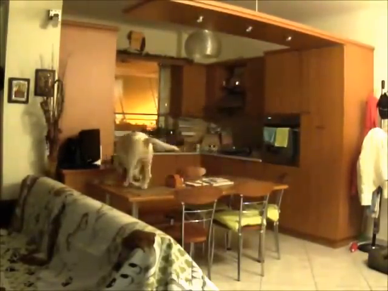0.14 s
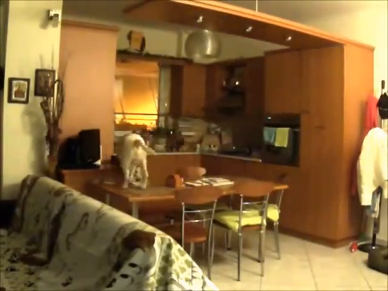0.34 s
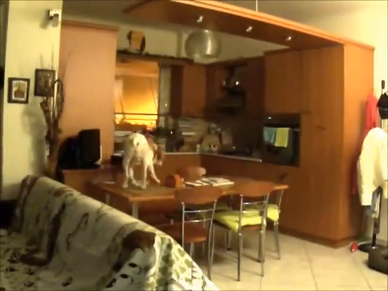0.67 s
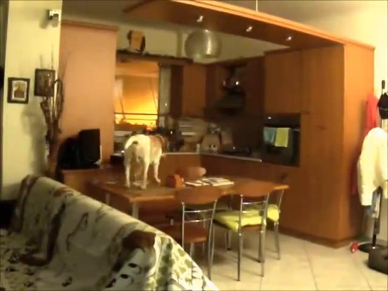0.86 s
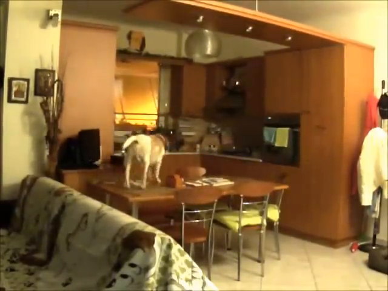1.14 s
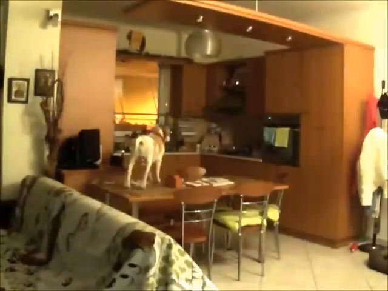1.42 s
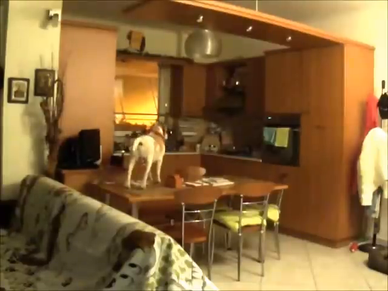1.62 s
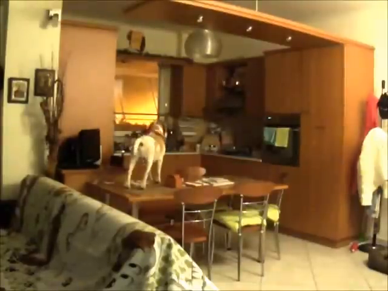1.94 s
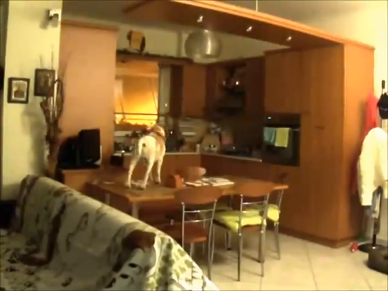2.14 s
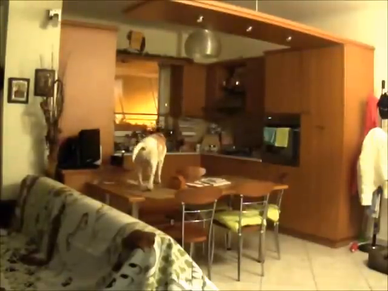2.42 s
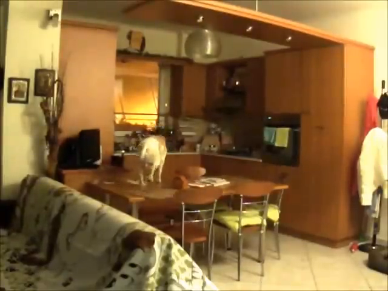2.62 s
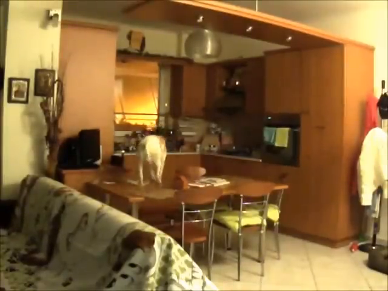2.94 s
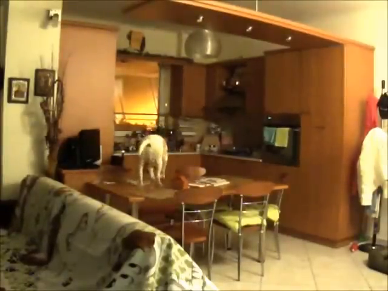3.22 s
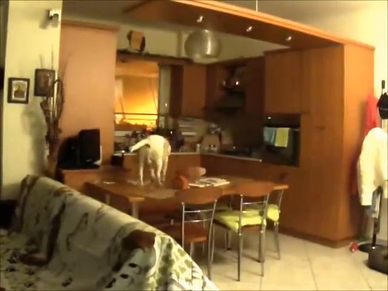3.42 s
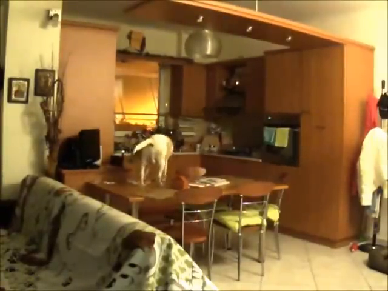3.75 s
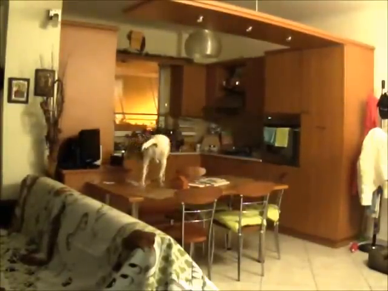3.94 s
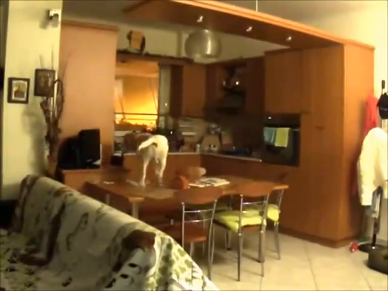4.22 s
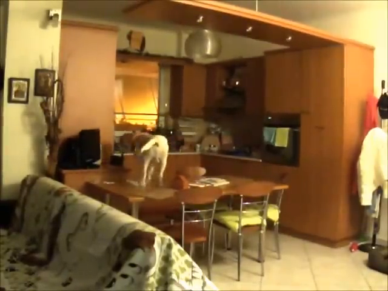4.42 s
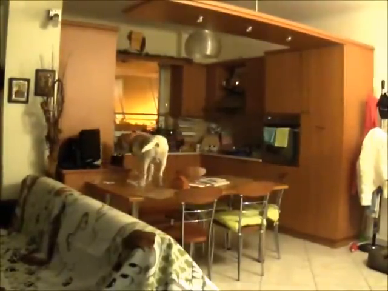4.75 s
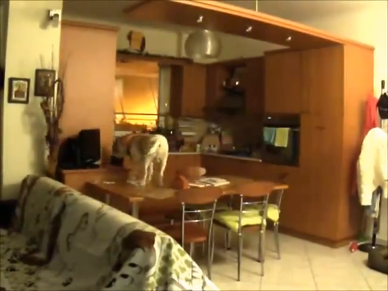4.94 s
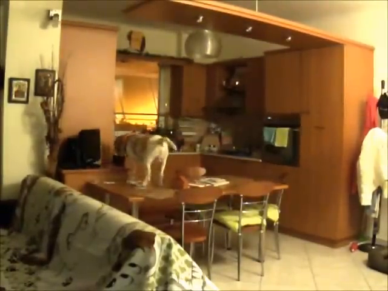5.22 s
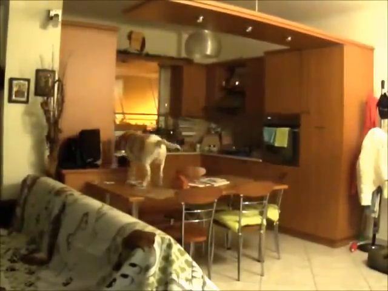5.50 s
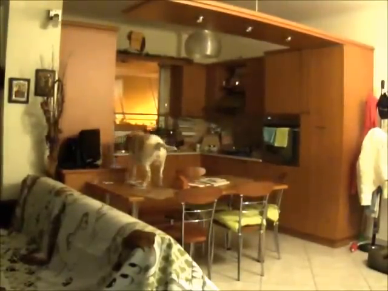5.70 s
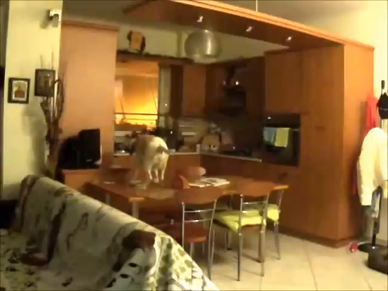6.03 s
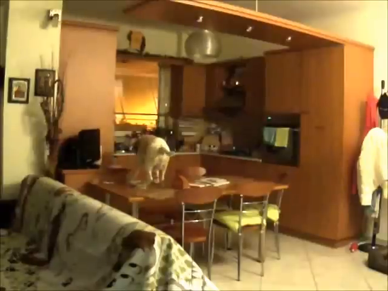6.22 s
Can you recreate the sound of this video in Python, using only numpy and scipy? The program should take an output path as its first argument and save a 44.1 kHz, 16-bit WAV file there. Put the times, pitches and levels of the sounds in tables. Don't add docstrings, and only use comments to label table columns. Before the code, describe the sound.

A dog's nails tick and skid on a wooden tabletop, its tag jingling faintly; bumps and knocks build to a loud scraping shove over fridge hum.

```python
import sys
import numpy as np
from scipy import signal
from scipy.fft import rfft, irfft
from scipy.io import wavfile

SR = 44100
rng = np.random.default_rng(int(sys.argv[2]) if len(sys.argv) > 2 else 0)


def volts(x):
    e = np.asarray(x, float) / 20
    return 10 ** e


def digitize_waveform(pressure):
    field = np.atleast_2d(pressure).T
    bounded = np.clip(field, -1, 1)
    quanta = np.round(bounded * 32767).astype(np.int16)
    wavfile.write(sys.argv[1], SR, quanta)


N = 280917

# (f/Hz, level/dB, t60/s)
WOOD = [(607, 3, 0.017), (762, 10, 0.014), (920, 8.5, 0.13), (1050, 12.5, 0.053), (1130, 5, 0.12),
        (400, -21, 0.05), (242, -15, 0.24)]


def unit(x):
    return x / np.sqrt(np.sum(x ** 2))


def level(x, db):
    return unit(x) * np.sqrt(len(x)) * volts(db)


def colour(x, table):
    hz, db = np.transpose(table)
    f = np.fft.rfftfreq(len(x), 1 / SR) + 1
    gain = volts(np.interp(np.log(f), np.log(hz), db))
    return irfft(rfft(x) * gain, len(x))


def band(x, lo_hz, hi_hz):
    sos = signal.butter(2, [lo_hz, min(hi_hz, SR / 2.1)], "band", fs=SR, output="sos")
    return signal.sosfilt(sos, x)


def ring(x, hz, t60_s):
    pole = np.exp((2j * np.pi * hz - np.log(1000) / t60_s) / SR)
    return signal.lfilter([1], [1, -pole], x).imag


def resonate(x, peaks):
    out = 0
    for k, (hz, width_hz, db) in enumerate(peaks):
        t60_s = np.log(1000) / (np.pi * width_hz)
        out = out + (-1) ** k * volts(db) * width_hz * ring(x, hz, t60_s)
    return out


def slips(rate_hz, spread_db):
    chance = rng.random((3, N))
    happens = chance[0] < rate_hz / SR
    size = volts(-min(spread_db, 3.5) * np.log(chance[2] + .03))
    return happens * np.sign(chance[1] - .5) * size


def stroke(s, hold_s, db, attack_s, release_s):
    edges_s = np.cumsum([s - attack_s, attack_s, hold_s, release_s])
    gain = np.zeros(N)
    on = np.arange(max(int(edges_s[0] * SR), 0), min(int(edges_s[-1] * SR), N))
    gain[on] = volts(db + np.interp(on / SR, edges_s, [-40, 0, 0, -40]))
    return gain


def swell(x, ms):
    return x * (1 - np.exp(-np.arange(len(x)) * 1000 / SR / max(ms, .2)))


def add(out, s, x):
    i = int(s * SR)
    out[i:i + len(x)] += x[:N - i]


def room_tails():
    # (f/Hz, t60/s)
    decays = [(250, 0.96), (600, 1), (1400, 0.74), (3000, 0.67), (6000, 0.62), (11000, 0.62)]
    t = np.arange(int(.9 * SR)) / SR
    bands = np.array([band(rng.standard_normal(3 * SR), hz / 1.5, hz * 1.5) for hz, _ in decays])
    bands /= np.std(bands, axis=1, keepdims=True) / np.sqrt([[hz] for hz, _ in decays])
    early = (1 - np.exp(-t / 0.0006)) * (1 + 0.23 * np.exp(-t / 0.093))
    return bands, np.array([np.exp(-np.log(1000) * t / t60_s) for _, t60_s in decays]) * early


def room(x, tails, place, direct_db):
    # (delay/ms, level/dB)
    bounces = [(4, -18), (6.5, -17), (9, -19), (13, -18), (22, -17), (31, -20)]
    bands, decay = tails
    start = int(place * SR)
    echo = unit(np.sum(bands[:, start:start + decay.shape[1]] * decay, axis=0))
    echo[0] = volts(direct_db)
    for k, (ms, db) in enumerate(bounces):
        echo[int(ms * (.9 + .2 * place) * SR / 1000)] += (-1) ** k * volts(db)
    return signal.fftconvolve(x, echo)


def hum():
    # (f/Hz, level/dB per Hz)
    air_spectrum = [(15, -66), (25, -32), (173, -11), (207, -12.5), (247, -10), (588, -3.5), (651, -5),
                    (979, -8.5), (1330, -9), (3320, -19), (3590, -23), (4070, -22.5), (5260, -23),
                    (11000, -25.5), (14300, -63), (22000, -120)]
    # (f/Hz, width/Hz, level/dB)
    peaks = [(100.1, 3.1, -7.5), (235, 17, -9), (301.2, 6.7, 2.5), (345, 38, -4.5), (599.4, 6.6, 4.5),
             (751, 10, -3.5), (1000, 53, -2.5)]
    # (f/Hz, level/dB)
    whine = [(3508, -70)]
    t = np.arange(N) / SR
    air = level(colour(rng.standard_normal(N), air_spectrum), -1.1)
    air += level(resonate(rng.standard_normal(N), peaks), -5)
    buzz = 0.49 + np.cos(np.pi * 59.9 * t) ** 30
    air += level(buzz * band(rng.standard_normal(N), 2100, 6200), -9.5)
    tones = sum(np.sqrt(2) * volts(db) * np.sin(2 * np.pi * hz * t) for hz, db in whine)
    return air * volts(-52) + tones


def contacts():
    # (t/s, click/dB, wood knock/dB, nail treble/dB)
    claws = [(0.0024, -31.5, -1.5, -12), (0.3347, -39.5, 0, -15), (0.4114, -24.5, -5, -5),
             (0.7113, -59, -26, -14), (1.0047, -42.5, -12, -13), (1.2141, -32, -0.5, -5),
             (2.8893, -37.5, -28, -5.5), (3.3514, -27, -6.5, -9.5), (3.6027, -36, -3, -8.5),
             (3.764, -31.5, -3, -1.5), (3.772, -27, -8.5, -8.5), (3.989, -39.5, -2, -12),
             (4.37, -30.5, -4.5, -7), (4.5246, -29, -1, -3), (4.5538, -28, -16, -7),
             (4.882, -28.5, -0.5, -1.5), (4.9033, -27.5, -2, -21), (5.623, -40.5, 7, -5),
             (6.0108, -17, 0.5, -3), (6.1605, -12, -3.5, -15)]
    # (t/s, click/dB, wood knock/dB)
    scuffs = [
        (0.213, -42, -25),
        (2.8188, -39.5, -20),
        (3.0889, -53, -16),
        (3.1469, -40, 3),
    ]
    # (t/s, click/dB, wood knock/dB, build-up/ms)
    bumps = [
        (2.3348, -29.5, 4.5, 4.3),
        (2.4762, -25.5, 4, 6.6),
        (2.6479, -25.5, 2, 2.8),
        (2.6748, -27.5, 0.5, 2.7),
        (5.277, -39, 13.5, 7.3),
        (5.361, -35.5, 10, 4.8),
        (5.4483, -28, 7.5, 1.1),
        (5.6007, -28.5, 11, 1.9),
        (5.6925, -9, -1, 2.5),
        (5.7072, -21, 7, 4.2),
    ]
    blows = [(s, db, wood, 5 + 0.34 * treble, treble, 3.8) for s, db, wood, treble in claws]
    blows += [(*row, 1.5, -8, 1.7) for row in scuffs]
    blows += [(s, db, wood, -9, -19, ms) for s, db, wood, ms in bumps]
    return sorted(blows)


def hits(tails):
    out, tick = np.zeros(N), np.eye(1, 4096, 64)[0]
    for s, db, wood_db, edge_db, treble_db, ms in contacts():
        chance, spots = rng.standard_normal((len(WOOD), 2)), rng.random(24)
        knock = sum(volts(g + a) * ring(tick, hz * (1 + 0.016 * b), t60_s)
                    for (hz, g, t60_s), (a, b) in zip(WOOD, chance))
        grain = tick + volts(-8) * unit(sum(ring(tick, 1200 + 9500 * u ** 1.4, .022) for u in spots))
        click = colour(grain, [(250, wood_db - 15.5), (600, wood_db - 8), (1000, wood_db - 0.5),
                               (1500, -0.62), (2400, -0.45), (4000, edge_db),
                               (7500, treble_db - 1.5), (11000, treble_db - 3)])
        sound = click + volts(wood_db - 23) * unit(band(knock, 260, 2300))
        heard = room(sound, tails, rng.random(), direct_db=-15)
        add(out, s - .002, volts(db + 29.5) * swell(heard, ms))
    return out


def skids(tails):
    # (t/s, length/s, level/dB, wood share/dB, treble share/dB)
    moves = [(0.057, 0.14, -56, -14, -1), (0.2, .08, -56.5, -15, 6.5), (0.337, 0.064, -45.5, -4, -3),
             (0.51, 0.13, -50.5, -20, 2), (0.99, 0.066, -55.5, -20, 3), (2.362, 0.085, -35.5, -4, -10.5),
             (2.463, 0.15, -32.5, 1.5, -8), (2.767, 0.033, -40.5, -5, -8), (2.826, 0.094, -51, -18, 6.5),
             (3.104, 0.061, -56, -7, 12.5), (5.733, 0.033, -15, -1.5, -19), (5.811, 0.143, -25.5, -4, -9)]
    # (f/Hz, level/dB per Hz)
    rub_spectrum = [(710, -48), (1200, -2.5), (2190, -4), (2360, -6), (3970, -11.5), (7320, -27.5),
                    (11000, -28), (14300, -57), (22000, -120)]
    gains = np.array([stroke(s, hold_s, db, .04, 0.029) for s, hold_s, db, _, _ in moves])
    gain = gains.sum(axis=0)
    wood, treble = volts(np.transpose(moves)[3:]) @ gains
    rub = colour(slips(3500, 5.1), rub_spectrum)
    board = band(sum(volts(g) * ring(slips(2500, 5.1), hz, t60_s) for hz, g, t60_s in WOOD[:5]), 400, 1270)
    dry = gain * level(band(rub, 1280, 3520), -9)
    dry += wood * level(board, -10)
    dry += treble * level(band(rub, 2800, 11000), -1.5)
    return room(dry, tails, 0.44, direct_db=-5)[:N]


def tag(tails):
    # (t/s, top note/dB, lower notes' share/dB)
    blows = [(0.3586, -33.5, -6), (0.3764, -38, 6), (0.3994, -36, 2), (0.4115, -45, -2), (0.7183, -46, -5),
             (0.8415, -38, -2.5), (0.8694, -52, 0), (0.9043, -37.5, -10), (0.9378, -47, -13),
             (0.9981, -64, -6), (1.1887, -59, 4), (5.2405, -60, -5)]
    # (f/Hz, t60/s)
    modes = [(10910, .04), (9340, .045), (7480, .008)]
    out, t = np.zeros(N), np.arange(8192) / SR
    for s, db, share_db in blows:
        chatter = unit(rng.standard_normal(len(t)) * np.exp(-t / 0.017))
        notes = [unit(band(ring(chatter, hz, t60_s), hz / 1.05, hz * 1.05)) for hz, t60_s in modes]
        notes.append(unit(band(chatter, 4400, 8200)))
        notes_db = [0, share_db, share_db - 6, -4]
        jingle = sum(volts(g) * note for g, note in zip(notes_db, notes))
        add(out, s - .001, volts(db + 19.5) * jingle)
    return room(out, tails, 0.41, direct_db=1.9)[:N] * volts(-6.5)


def rings(tails):
    # (t/s, level/dB, f/Hz)
    taps = [(0.41, -39, 1500), (0.411, -37, 2870), (0.653, -47.5, 1195), (0.71, -47, 2640),
            (0.77, -56, 2330), (0.845, -51.5, 3550), (1.012, -57, 5080), (2.338, -47, 990),
            (2.648, -56, 9800), (2.648, -45.5, 4520), (3.145, -41, 3990), (3.352, -36, 2300),
            (3.352, -38.5, 1544), (3.351, -37.5, 2680), (3.35, -40, 3130), (3.773, -45, 1025),
            (4.372, -40, 2730), (4.374, -50, 3170), (4.526, -37, 1570), (4.527, -37, 3106),
            (4.555, -42, 920), (4.883, -39.5, 1633), (4.904, -44, 4400), (5.451, -35.5, 1050),
            (5.602, -30.5, 1050), (5.625, -33, 906), (5.697, -26, 1570), (5.707, -19, 921),
            (5.712, -22, 1513)]
    # (t/s, level/dB, f/Hz)
    dish = [
        (2.336, -44, 2000),
        (2.39, -45, 1990),
        (2.646, -28.5, 2030),
        (2.675, -37, 2005),
        (2.74, -43, 2010),
    ]
    out, tap = np.zeros(N), np.pad(np.hanning(7), (0, 8192))
    notes = [(s, db, hz, .045 * (1000 / hz) ** .4) for s, db, hz in taps] + [(*row, 0.13) for row in dish]
    for s, db, hz, t60_s in notes:
        pair = ring(tap, hz, t60_s) + .7 * ring(tap, hz * 1.03, t60_s / 2)
        note = unit(band(pair, hz / 2.6, hz * 2.04))
        heard = room(note, tails, rng.random(), direct_db=9)
        add(out, s - .001, volts(db + 27) * swell(heard, 5))
    return out


def ticks():
    # (t/s, level/dB, centre f/Hz)
    creaks = [
        (1.0065, -50, 9800),
        (2.891, -48, 4500),
        (4.2245, -50, 5000),
        (4.862, -51, 5200),
        (5.358, -42, 4000),
        (6.1605, -8, 2500),
    ]
    out, t = np.zeros(N), np.arange(400) / SR
    for s, db, hz in creaks:
        burst = rng.standard_normal(len(t)) * np.exp(-t / .0012)
        add(out, s, volts(db + 12) * band(burst, hz / 1.4, hz * 1.4))
    return out


def groans(tails):
    # (t/s, length/s, level/dB)
    shifts = [
        [(2.775, 0.029, -42), (4.29, .05, -41), (5.295, .1, -40.5), (5.7, 0.021, -33), (5.75, 0.021, -37.5),
         (5.89, .015, -47)],
        [(2.74, 0.021, -43), (2.86, 0.054, -54.5), (4.28, 0.069, -55.5), (5.285, 0.036, -43.5), (5.4, .03, -49),
         (5.465, 0.022, -40), (5.635, 0.032, -42), (5.7, .015, -40.5)],
        [(2.745, .06, -50), (4.29, 0.062, -57), (5.7, 0.055, -46.5)],
    ]
    # (f/Hz, width/Hz)
    frame = [(400, 32), (228, 28), (132, 30)]
    dry = np.zeros(N)
    for rows, (hz, width_hz) in zip(shifts, frame):
        load = sum(stroke(*row, 0.053, 0.11) for row in rows)
        narrow = resonate(slips(900, 1.04), [(hz, width_hz, 0)])
        dry += load * level(resonate(narrow, [(hz, 2 * width_hz, 0)]), -7)
    return band(room(dry, tails, 0.39, direct_db=2.6)[:N], 120, 750) * volts(0.5)


def shove(tails):
    # (f/Hz, width/Hz, level/dB)
    body_peaks = [(655, 25, -5), (675, 20, -11), (830, 25, -6), (910, 25, 0), (970, 25, -3), (1025, 25, -7),
                  (1090, 25, -7), (1118, 30, -3), (1325, 30, -6), (1480, 60, -10)]
    # (f/Hz, width/Hz, level/dB)
    stiff_peaks = [(2047, 91, 2.5), (2666, 110, 0.5), (3240, 58, -5), (3600, 23, -9), (3850, 330, -1),
                   (4050, 75, -1), (4730, 48, -14)]
    # (f/Hz, level/dB per Hz)
    hiss_spectrum = [(120, -63), (200, -29), (575, -9.5), (647, -0.5), (889, 6), (1180, 0), (1350, -22),
                     (1710, -3), (3830, -4), (11000, -18), (14300, -59), (22000, -120)]
    # (t/s, level/dB)
    lurches = [
        (6.011, -11.5),
        (6.107, -12.5),
        (6.3, -35),
    ]
    push = stroke(6.008, N / SR, 0, 0.076, 1)
    lurch = sum(stroke(s, 0, db, 0.0089, 0.11) for s, db in lurches)
    rub = slips(1800, 2.5)
    rasp = level(resonate(rub, stiff_peaks), -8) + level(colour(slips(7000, 2.4), hiss_spectrum), -3.84)
    squeal = level(resonate(slips(5000, 4), [(10620, 190, 0)]), 0) + level(band(rub, 4500, 14000), 5)
    squeak = stroke(5.989, .028, -28, 0.0071, .015) * squeal
    body = level(band(resonate(rub, body_peaks), 470, 2600), -1.5)
    dry = (volts(-22) * push + lurch) * body
    dry += (volts(-15.5) * push + volts(-9.5) * lurch) * rasp
    dry += squeak
    return room(dry, tails, .7, direct_db=6)[:N] * volts(-8.5)


def scene():
    tails = room_tails()
    echoing = sum(source(tails) for source in (hits, skids, tag, rings, groans, shove))
    return (hum() + echoing + ticks())[None]


def band_limit(x):
    return signal.sosfilt(signal.butter(12, 15640, fs=SR, output="sos"), x)


def record(dry):
    rounded = np.tanh(1.071 * dry[0]) / 1.2
    thump = band(np.abs(band(dry[0], 3200, 12000)), 27, 157)
    spec = rfft(rounded + volts(-16) * thump)
    edge, shift, fill, top = (int(hz * N / SR) for hz in (11025, 3960, 7900, 15700))
    spec[edge:edge + shift] = spec[edge - shift:edge] * volts(-14 + 4 * np.arange(shift) / shift)
    spec[edge + shift:edge + 2 * shift] = spec[fill:fill + shift] * volts(-14)
    spec[top:] = 0
    return band_limit(irfft(spec, N)[None])


dry = scene()
out = record(dry)
digitize_waveform(out)
```